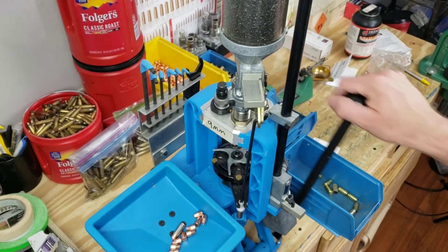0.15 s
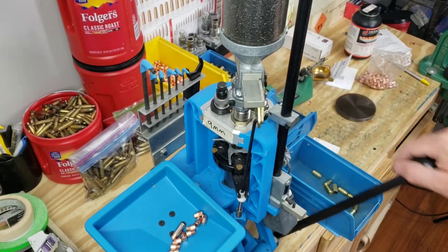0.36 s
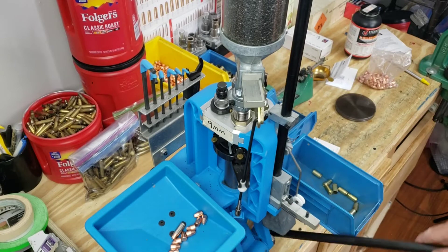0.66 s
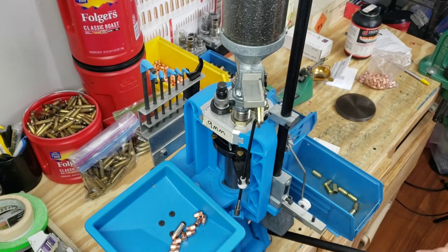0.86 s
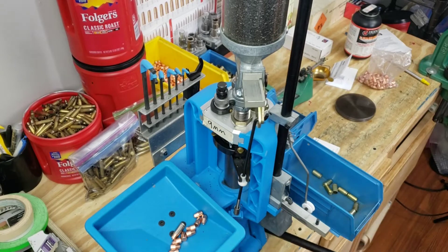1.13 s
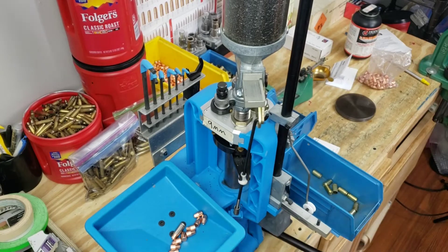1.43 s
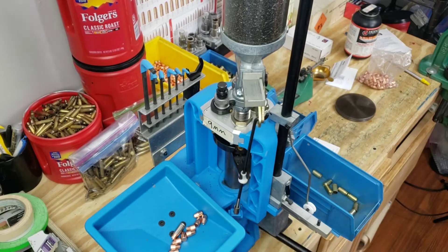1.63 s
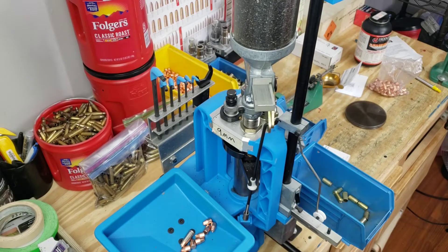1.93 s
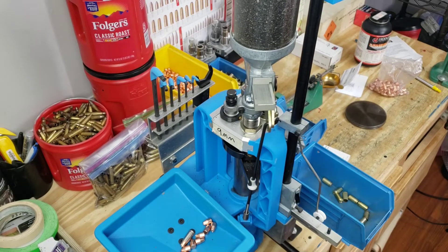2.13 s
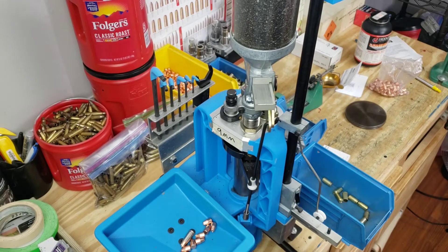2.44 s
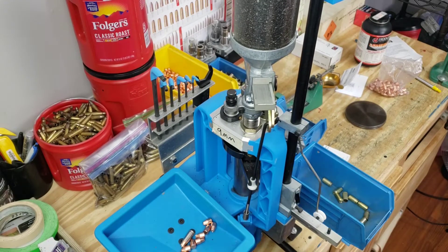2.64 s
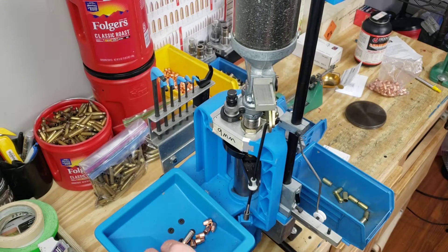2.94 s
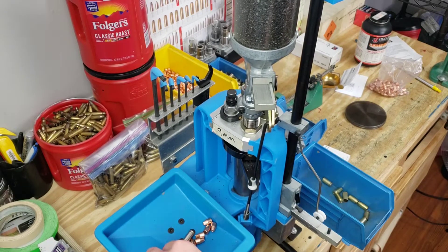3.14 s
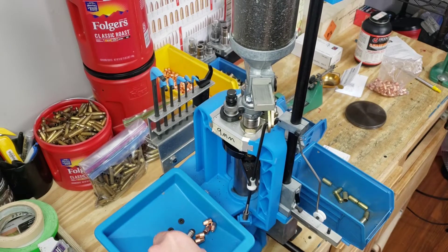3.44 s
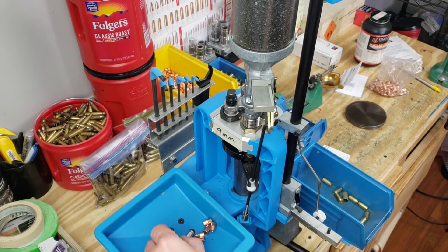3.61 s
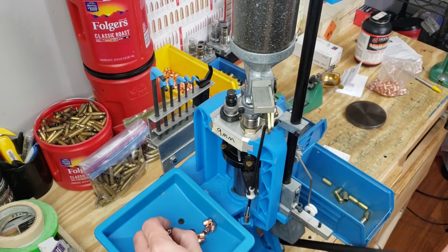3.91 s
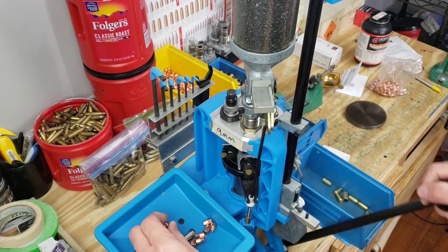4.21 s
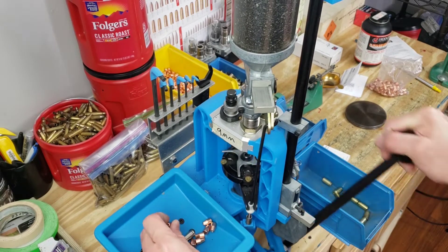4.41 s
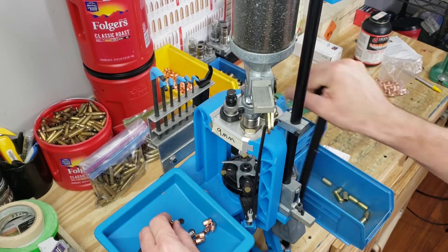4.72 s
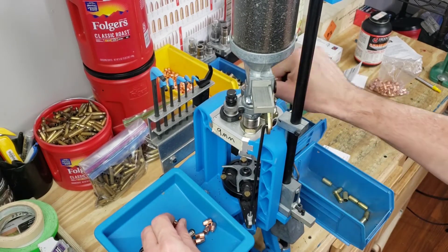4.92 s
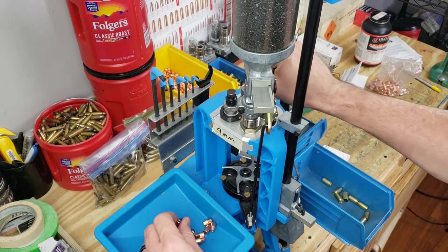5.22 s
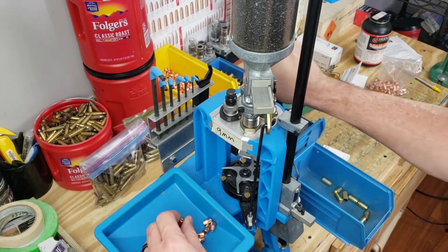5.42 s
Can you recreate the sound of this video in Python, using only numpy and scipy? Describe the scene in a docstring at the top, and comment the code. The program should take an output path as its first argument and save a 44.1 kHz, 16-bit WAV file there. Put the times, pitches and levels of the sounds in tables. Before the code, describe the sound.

A hand press on a wooden bench is heard close up in a small room with a short reverb. A sharp clack starts at 0 s, a duller knock with brassy tinkle follows at 0.18, and a crisp double clack at 0.4. After a faint rub near 0.9, a solid woody thump lands at 1.1, with smaller knocks to 1.6 and the strong, dull lever-stop clunk at 1.72. Then it is nearly quiet: a tiny tick at 2.6 and two faint springy jangles around 3.1-3.2. From 3.35 to 3.8 comes a dense clatter: scraping, brass cases rattling, heavy knocks at 3.46 and 3.66, spring and rod ringing at 3.72-3.76. Light high clinks and short rubs run from 4.37 to 4.7, a bright steel ping at 4.75, then soft thuds to 5.06 and at 5.43. Faint wavering mains hum, low air murmur and thin hiss, stronger around 3.6-4 and at the end, lie underneath.

```python
"""Reloading press on a workbench

A hand-operated press on a wooden bench goes through one lever cycle: its linkage clacks and thumps.
Each blow excites damped modes and short noise bursts; brass cases, a return spring and a steel part ring.
The ram rubs in dense slips, small parts clink and two faint springy jangles sound; a room answers the blows.
Underneath lie a faint wavering mains hum, a low murmur of air and a thin hiss of changing level.
"""
import sys
import numpy as np
from scipy import signal
from scipy.fft import rfft, irfft, next_fast_len
from scipy.io import wavfile
from scipy.ndimage import map_coordinates

SR = 44100
rng = np.random.default_rng(int(sys.argv[2]) if len(sys.argv) > 2 else 0)


def master(y):
    """Save y as 16-bit WAV."""
    cut = np.clip(np.atleast_2d(y).T, -1, 1)
    pcm = np.round(cut * 32767)  # scale
    wavfile.write(sys.argv[1], SR, pcm.astype(np.int16))


N = 245195
T = np.arange(int(0.55 * SR)) / SR  # time axis of a single blow, s


def amp(db):
    """Level law: decibels to amplitude ratio."""
    return 10 ** (np.asarray(db) / 20)


def unit(x):
    """Normalization: scale a signal to rms 1."""
    return x / np.sqrt(np.mean(x ** 2) + 1e-20)


def along(points, hz):
    """Logarithmic frequency scale: interpolate (frequency, value) points along it."""
    f, v = np.transpose(points)
    return np.interp(np.log(hz + 1), np.log(f + 1), v)


def noise(spectrum, size):
    """Spectral shaping: white noise filtered to a given density, at rms 1."""
    m = next_fast_len(size)
    gain = amp(along(spectrum, np.fft.rfftfreq(m, 1 / SR)))
    return unit(irfft(rfft(rng.standard_normal(m)) * gain, m)[:size])


def fade(t60, attack):
    """Exponential damping: a quick rise (time constant attack, s), then a fall of 60 dB in t60 s."""
    return np.exp(-np.log(1000) * T / t60) * (1 - np.exp(-T / attack))


def burst(spectrum, t60, attack):
    """High modal density: countless short-lived modes merge into a dying puff of noise."""
    shape = fade(t60, attack)
    shape_rms = np.sqrt(np.mean(shape ** 2))
    return unit(noise(spectrum, len(T)) * shape) * shape_rms


def ring(modes, attack, scatter_db, after_db=-100, after_t60=0.22, blur_hz=0):
    """Modal superposition: damped sines at new strengths each blow, blurred in pitch by loose contact."""
    hz, db, t60 = np.transpose(modes)
    gain = amp(db + scatter_db * rng.standard_normal(len(hz)))
    gain = gain / np.sqrt(np.sum(gain ** 2) / 2)
    after_ring = amp(after_db) * fade(after_t60, attack)

    # the phase of each mode wanders as a random walk, which widens its spectral line
    knots = T[::64]
    step_size = np.sqrt(2 * np.pi * blur_hz * knots[1])
    steps = rng.standard_normal((len(hz), len(knots))) * step_size
    phase = rng.uniform(0, 2 * np.pi, (len(hz), 1)) + np.cumsum(steps, axis=1)

    out = np.zeros(len(T))
    for g, f, p, d in zip(gain, hz, phase, t60):
        tone = np.sin(2 * np.pi * f * T + np.interp(T, knots, p))
        out += g * tone * (fade(d, attack) + after_ring)
    return out


def later(sound, s):
    """Pure delay: the same sound, s seconds later."""
    return np.pad(sound, (round(s * SR), 0))[:len(sound)]


# reverberation time of the room: frequency_hz, t60_s
ROOM_T60 = [(100, 0.59), (500, 0.33), (2000, 0.34), (6000, 0.33), (11000, .34), (16000, 0.31)]
# colour of the room's answer: frequency_hz, level_db
ROOM_LEVEL = [(100, 4), (500, -6.5), (2000, 0.5), (6000, 0), (14000, -3)]


def add(track, s, sound, wet_db):
    """Diffuse reverberation: place a sound at s seconds, convolved with its own decaying noise tail."""
    hz, t, grains = signal.stft(rng.standard_normal(len(T)), SR, nperseg=256)
    t60 = along(ROOM_T60, hz)[:, None]
    equal_energy = np.sqrt(2 * np.log(1000) / (t60 * SR))  # long decays get no extra energy
    decay = np.exp(-np.log(1000) * t / t60) * equal_energy
    colour = amp(along(ROOM_LEVEL, hz))[:, None]
    tail = signal.istft(grains * decay * colour, SR, nperseg=256)[1][:len(T)]
    tail = tail * (1 - np.exp(-T / 0.0045))  # the answer builds up gradually
    heard = sound + amp(wet_db) * signal.fftconvolve(sound, tail)[:len(T)]
    start = round(s * SR)
    track[start:start + len(T)] += heard[:len(track) - start]


# contacts in the press; weight drives bench and frame, hardness the treble:
# start_s, force_db, weight_db, hardness_db
CLACKS = [(0.0, -24, -15.5, -5), (0.182, -29.5, -20, -20.5), (0.372, -53, -14, 2), (0.389, -41.5, -18.5, 2),
          (0.402, -24, -34.5, -3), (0.406, -23, -16, -4), (0.889, -61, -26, 14), (0.948, -61, -28, 8),
          (1.089, -24.5, -6, -11.5), (1.183, -43, -13, -13), (1.345, -48, -19, -32), (1.393, -53, 3, 3.5),
          (1.418, -65, 15, 16.5), (1.591, -37, 6.5, -12), (1.631, -34.5, -13, -7.5), (1.719, -18, 0, -13),
          (1.823, -49, -5, 9.5), (2.597, -58.5, -29, 3), (3.348, -41.5, 8, -5), (3.376, -38, 5.5, -6.5),
          (3.413, -31, 0, -20), (3.458, -21.5, -14, -21), (3.486, -40.5, 10, 2), (3.662, -21.5, -1, -20.5),
          (3.697, -33, 0, -22), (3.744, -25.5, -18, -7), (3.756, -33.5, -9, 1), (3.782, -34, -4.5, -3),
          (4.375, -38.5, -5.5, 4.5), (4.477, -41, -9, 3), (4.611, -53.5, 3, 3), (4.756, -41, -7.5, 4),
          (4.84, -31.5, -9.5, -17.5), (4.908, -37.5, -10.5, -21), (4.998, -39.5, 10, -6),
          (5.06, -41, 1.5, -43), (5.433, -36.5, 4.5, -20.5), (5.497, -53, 4, -8)]
# modes of the bench top: pitch_hz, level_db, t60_s
BENCH = [(67.36, -3.5, .45), (84.6, -12.5, .25), (98.4, -5.5, .25), (120.1, -5, 0.3), (158.6, -2.5, 0.2),
         (185.6, -4, 0.21), (227.4, -4.5, 0.22), (294.4, -6.5, .3)]
# modes of the press frame and its lever: pitch_hz, level_db, t60_s
FRAME = [(344, -10, 0.24), (396.5, -8.5, 0.2), (452, -7.5, 0.67), (478, 0, 0.28), (572.8, 1.5, 0.2),
         (626, -5, 0.3), (760.3, 0.5, 0.18), (829, 4, 0.094), (914, -10.5, 0.033)]
# modes of the steel lever: pitch_hz, level_db, t60_s
LEVER = [(1086, 3.5, 0.033), (1168, 3, 0.06), (1510, 0.5, 0.04), (1792, -3, .06)]
# noise colour of each part of a contact, from bench to steel: frequency_hz, density_db_per_hz
THUD = [(25, -48), (38, -25), (55, -16.5), (100, 4.5), (250, 2), (420, -1), (800, -49)]
KNOCK = [(130, -35.5), (330, -12.5), (550, 7.5), (860, 0), (1100, -1.5), (2000, -43)]
RAP = [(600, -29), (960, -7.5), (1250, -1), (1600, -2.5), (2000, -5.5), (2500, -10), (4000, -41.5)]
CLACK = [(1200, -10.5), (2150, -3), (2900, 0), (4500, -6.5), (5500, -6), (6500, -6), (7600, -4.5),
         (8600, -16.5), (11000, -31)]
SNAP = [(5000, -27.5), (8400, -12), (9800, -3), (11700, 1.5), (13000, -5.5), (15500, -5), (17000, -25)]
FRAME_SHARE, CLACK_SHARE = 0.39, 0.4  # how far the frame follows weight, and the clack hardness
REBOUND_S, REBOUND_DB = 0.012, -4  # the frame rocks back with a second, dull knock
ROOM_DB, DRY_ABOVE_DB, DRY_SLOPE = 1.5, -25.5, 0.98  # blows harder than this sound drier (dB per dB)


def linkage():
    """Impact excitation: a contact cracks, raps the lever, knocks the frame, shakes the bench and rebounds."""
    out = np.zeros(N)
    for s, force_db, weight_db, hardness_db in CLACKS:
        boards = ring(BENCH, attack=0.004, scatter_db=2)
        bench = amp(-3) * boards + amp(1) * burst(THUD, t60=0.18, attack=0.0041)

        frame_modes = ring(FRAME, attack=0.00084, scatter_db=3, blur_hz=2.6)
        frame = amp(-5.5) * frame_modes + amp(4.5) * burst(KNOCK, t60=0.048, attack=0.0019)

        lever_modes = ring(LEVER, attack=0.00022, scatter_db=4)
        lever = amp(-3) * lever_modes + amp(5) * burst(RAP, t60=0.028, attack=0.0032)

        clack = amp(6.5) * burst(CLACK, t60=0.036, attack=0.0021)
        snap = amp(7) * burst(SNAP, t60=0.039, attack=0.00057)
        crack = amp(CLACK_SHARE * hardness_db) * clack + amp(hardness_db) * snap

        dull_thud = amp(-4) * burst(THUD, t60=0.13, attack=0.004)
        dull_knock = burst(KNOCK, t60=0.16, attack=0.0044)
        rebound = amp(weight_db + REBOUND_DB) * (dull_thud + dull_knock)

        body = amp(weight_db) * bench + amp(FRAME_SHARE * weight_db) * frame
        blow = body + lever + crack + later(rebound, REBOUND_S)
        wet_db = ROOM_DB - DRY_SLOPE * max(force_db - DRY_ABOVE_DB, 0)
        add(out, s, amp(force_db) * blow, wet_db)
    return out


# short pushes of the sliding ram: start_s, length_s, level_db
SLIDES = [(0.328, 0.059, -53), (0.876, 0.16, -58), (1.18, .04, -52), (1.33, 0.04, -70),
          (3.427, 0.082, -42.5), (4.524, 0.014, -44), (4.614, 0.078, -51), (4.774, .06, -47.5)]
# noise colour of the rubbing: frequency_hz, density_db_per_hz
RUB = [(300, -15), (600, -0.5), (1200, -4.5), (2400, -1.5), (3100, -2.5), (4000, -5), (5100, -2.5),
       (6200, -1.5), (7200, -4), (8400, -32.5), (9600, -5.5), (12000, 3), (15500, -7.5)]
# faint modes of the sliding cam: pitch_hz, level_db, t60_s
CAM = [(2940, -3.5, .025), (3450, -1.5, .025), (4150, -12.5, .02), (5250, 2, 0.03), (7200, 0.5, .025),
       (9460, -9, 0.014), (11000, 6.5, 0.018)]
GRIP_S, RELEASE_S = 0.007, 0.3  # a push builds up linearly, and dies by 60 dB


def ram():
    """Sliding friction: a dense run of tiny uneven slips modulates noise and excites the cam's modes."""
    t = np.arange(N) / SR
    slips = (rng.random(N) < 1200 / SR) * rng.exponential(1, N)  # 1200 slips per second on average
    grip = unit(signal.fftconvolve(slips, fade(t60=0.025, attack=0.0005))[:N])
    signed_slips = slips * rng.standard_normal(N)
    cam_modes = ring(CAM, attack=0.00029, scatter_db=1.5)
    cam = unit(signal.fftconvolve(signed_slips, cam_modes)[:N])
    rubbing = amp(1.5) * grip * noise(RUB, N) + amp(-4) * cam

    push = np.zeros(N)
    for s, length, db in SLIDES:
        rise = np.clip((t - s) / GRIP_S, 0, 1)
        release = np.exp(-np.log(1000) * np.maximum(t - s - length, 0) / RELEASE_S)
        push += amp(db) * rise * release
    return push * rubbing


# brass cases jostled in the shell plate, the last two relative to the first level:
# start_s, level_db, low_mode_db, contact_db
CASE_HITS = [(0.1819, -15.5, -14, -3), (0.192, -24.5, -2, -5.5), (3.427, -25.5, 0, -3),
             (3.454, -24.5, -9, -21), (3.4865, -22, -6, -33), (3.496, -17, -23, -12), (3.537, -33, -29, 4)]
# high modes of a case: pitch_hz, level_db, t60_s
CASE = [(9260, -23.5, 0.3), (11250, -7, 0.1), (11640, -9, 0.19), (11460, -12, 0.047), (13000, -19, 0.033),
        (14230, -16.5, 0.043), (14800, -4, 0.039), (13750, 5.5, 0.048), (15160, -6.5, 0.073),
        (15700, -19.5, .1)]
# its lower wall mode: pitch_hz, level_db, t60_s
CASE_LOW = [(4750, 0, 0.047)]


def cases():
    """Shell vibration: thin brass tubes ring in close high modes above one lower wall mode."""
    out = np.zeros(N)
    for s, db, low_db, contact_db in CASE_HITS:
        # no two cases are quite alike
        tube = [(hz * (1 + 0.0034 * rng.standard_normal()), level, t60) for hz, level, t60 in CASE]
        high = ring(tube, attack=0.0005, scatter_db=2.5, after_db=-27, after_t60=0.35, blur_hz=60)
        low = ring(CASE_LOW, attack=0.00035, scatter_db=0, after_db=-18, after_t60=0.48, blur_hz=40)
        contact = burst(SNAP, t60=0.03, attack=0.0004)
        hit = amp(-0.5) * high + amp(low_db - 10) * low + amp(contact_db) * contact
        add(out, s, amp(db) * hit, wet_db=-3.5)
    return out


# a hard steel part struck as the lever comes home, contact relative to level: start_s, level_db, contact_db
STEEL_HITS = [(4.708, -24, -2.5), (4.7548, -11, -5), (4.795, -22, -15), (4.919, -41, 1)]
# its modes: pitch_hz, level_db, t60_s
STEEL = [(6650, -18, .05), (7214, -3, .055), (8183, -16, .07), (9114, -9, .065), (9238, -11, .05),
         (10290, -14, .06), (10540, -9, .06), (10920, -9, .05), (11770, -16, .05), (12265, -4, .05),
         (12400, -13, .04), (13420, -11, .06), (13865, -2, .07), (14250, -10, .05), (14920, 0, .065),
         (15150, -13, .04)]


def steel():
    """Hard impact: a light touch, a bright ping and two small rebounds excite dense high modes."""
    out = np.zeros(N)
    for s, db, contact_db in STEEL_HITS:
        ping = ring(STEEL, attack=0.0007, scatter_db=1, after_db=-16.5, after_t60=0.38, blur_hz=14)
        contact = burst(SNAP, t60=0.072, attack=0.00076)
        add(out, s, amp(db) * (amp(-1.5) * ping + amp(contact_db) * contact), wet_db=-4.5)
    return out


# jolts of the return spring and its rod: start_s, coils_db, rod_db
SPRING_HITS = [(1.824, -78, -67), (3.49, -35, -48), (3.56, -51, -46.5), (3.721, -28.5, -32.5),
               (3.756, -27.5, -28.5)]
# modes of the coils: pitch_hz, level_db, t60_s
SPRING = [(790, -13, .2), (1130, -13, .22), (1808, -10, .26), (2326, -1, .26), (2590, -3, .36),
          (2690, -6, .28), (2805, -6, .18), (3380, -7, .15), (3600, -7, .15), (3941, -10, .2),
          (4920, -12, .18), (7181, -12, .14)]
# the single mode of the rod: pitch_hz, level_db, t60_s
ROD = [(3490, 0, 0.26)]


def spring():
    """Coil and rod resonance: the coils buzz and ring, while the stiff rod holds one clear note."""
    out = np.zeros(N)
    for s, coils_db, rod_db in SPRING_HITS:
        twang = ring(SPRING, attack=0.002, scatter_db=1.5, blur_hz=10)
        buzz = amp(-14) * burst(CLACK, t60=0.07, attack=0.004)
        note = ring(ROD, attack=0.0015, scatter_db=0)
        add(out, s, amp(coils_db) * (amp(-5.5) * twang + buzz), wet_db=-2)
        add(out, s, amp(rod_db) * note, wet_db=-7)
    return out


# two faint springy jangles: start_s, level_db
JANGLE_HITS = [(3.116, -50), (3.182, -43.5)]
# modes of the faint jangle: pitch_hz, level_db, t60_s
JANGLE = [(825, -14, 0.39), (1158, -8, 0.14), (1770, -14, 0.49), (2377, -7, 0.21), (2623, -6, 0.21),
          (2880, -16, 0.16), (3456, -3.5, 0.059), (3400, -12, 0.13), (3830, -15, 0.1), (7660, -29, .25)]


def jangle():
    """Modal ringing: two faint springy jangles, each a set of damped modes with a soft puff of noise."""
    out = np.zeros(N)
    for s, db in JANGLE_HITS:
        ringing = ring(JANGLE, attack=0.00043, scatter_db=1, blur_hz=21.4)
        puff = amp(-15) * burst(CLACK, t60=0.087, attack=0.0051)
        add(out, s, amp(db) * (ringing + puff), wet_db=0)
    return out


# single light clinks of bullets and small parts: start_s, level_db, pitch_hz
CLINKS = [(.403, -21, 6320), (1.013, -52.5, 3880), (1.344, -58, 2750), (1.825, -39, 3650),
          (1.823, -34.5, 11300), (3.425, -32, 14240), (3.756, -20.5, 10950), (4.374, -22.5, 10510),
          (4.479, -34.5, 4670), (4.479, -24.5, 11700), (4.611, -46.5, 3030), (4.709, -38, 5620),
          (4.653, -26.5, 10300), (4.709, -24, 15500), (4.919, -23.5, 14900)]
CLINK_CYCLES = 400  # a clink falls by 60 dB in this many cycles


def clinks():
    """Constant-Q damping: each part rings in a close cluster of modes, shorter at higher pitch."""
    out = np.zeros(N)
    for s, db, hz in CLINKS:
        t60 = CLINK_CYCLES / hz
        cluster = [(hz, 0, t60), (hz * 1.021, -4, t60), (hz * 0.975, -5, t60)]
        clink = ring(cluster, attack=0.0006, scatter_db=1.5, blur_hz=70)
        add(out, s, amp(db) * clink, wet_db=-7)
    return out


# lines of the mains hum, level as rms before the waver: pitch_hz, level_db, waver_db
HUM = [(119.7, -48, .6), (239.8, -51, 1.0)]
# noise colour of the room's air: frequency_hz, density_db_per_hz
AIR = [(20, -25), (45, -3.5), (70, 7), (130, -3), (250, -1.5), (400, -20.5), (700, -31), (1200, -32),
       (1700, -19.5), (2400, -33.5), (8000, -44), (16000, -29)]
# noise colour of the hiss: frequency_hz, density_db_per_hz
HISS = [(400, 7), (1700, -14), (3000, -13), (5500, -12.5), (7200, -2), (8600, -15.5), (10000, 0.5),
        (11500, 9.5), (13000, -6.5), (15500, -4.5)]
# course of the hiss: time_s, level_db
HISS_LEVEL = [(0.7, -63), (1.53, -64.0), (2.03, -70.7), (2.54, -72.5), (2.67, -61), (3.05, -69), (3.3, -57),
              (3.63, -49.5), (4.02, -51.5), (4.32, -58), (5.26, -65.5), (5.34, -51), (5.53, -51.5)]


def background():
    """Tones and noise: wavering mains hum, a steady low murmur of air, and hiss that rises and falls."""
    t = np.arange(N) / SR
    hum = np.zeros(N)
    for hz, db, waver_db in HUM:
        waver = map_coordinates(rng.standard_normal(int(N / SR * 6) + 4), [t * 6])  # 6 points per second
        line = np.sqrt(2) * np.sin(2 * np.pi * hz * t + rng.uniform(0, 2 * np.pi))
        hum += amp(db + waver_db * waver) * line
    murmur = amp(-52) * noise(AIR, N)
    hiss_db = np.interp(t, *np.transpose(HISS_LEVEL))
    return hum + murmur + amp(hiss_db) * noise(HISS, N)


def scene():
    """Linear superposition: the press and its small parts over the quiet room."""
    press = linkage() + ram()
    small_parts = cases() + steel() + spring() + jangle() + clinks()
    return (press + small_parts + background())[None]


TOP_HZ = 15900  # band limit, where the amplitude is halved


def record(dry):
    """Band limitation: a very steep low-pass removes what lies above the microphone's limit."""
    m = next_fast_len(N + len(T))
    hz = np.fft.rfftfreq(m, 1 / SR)
    low_pass = 1 / (1 + (hz / TOP_HZ) ** 160)
    return irfft(rfft(dry, m) * low_pass, m)[:, :N]


dry = scene()
out = record(dry)
master(out)
```